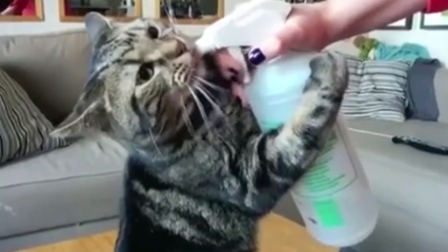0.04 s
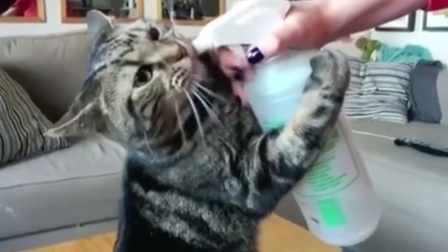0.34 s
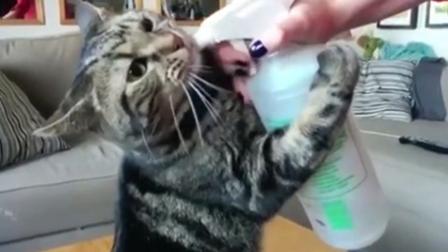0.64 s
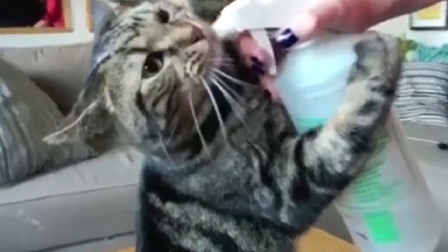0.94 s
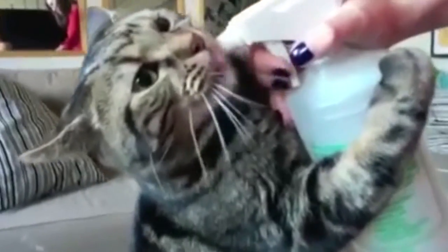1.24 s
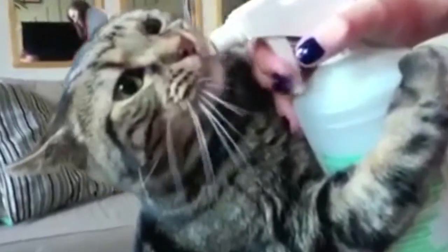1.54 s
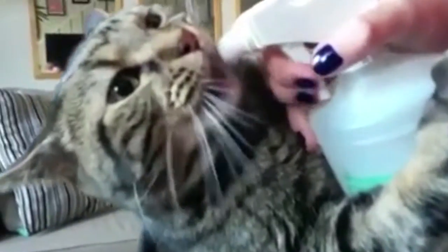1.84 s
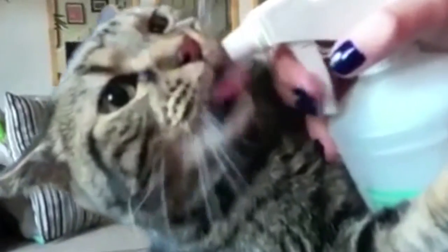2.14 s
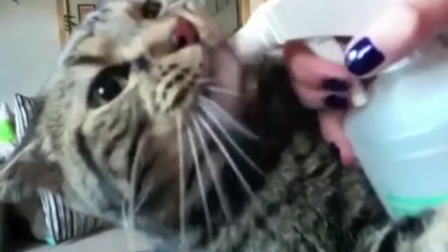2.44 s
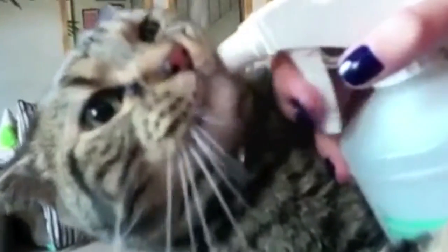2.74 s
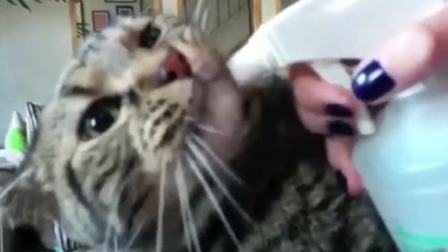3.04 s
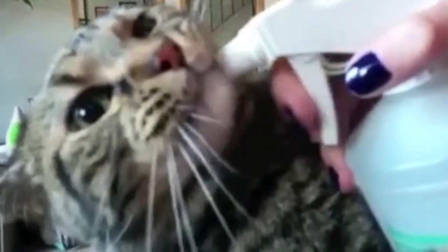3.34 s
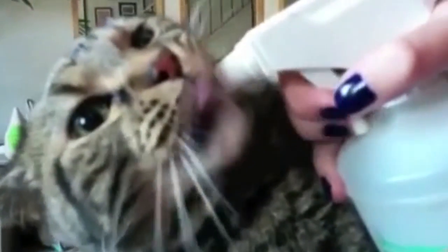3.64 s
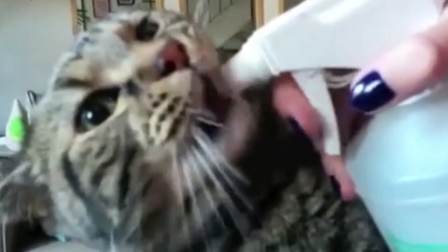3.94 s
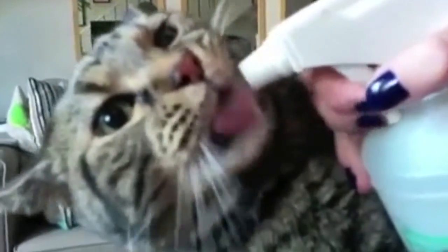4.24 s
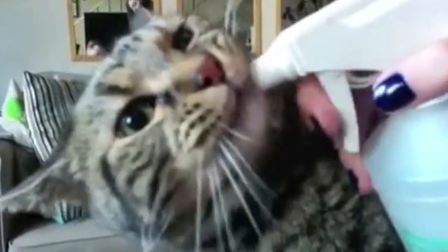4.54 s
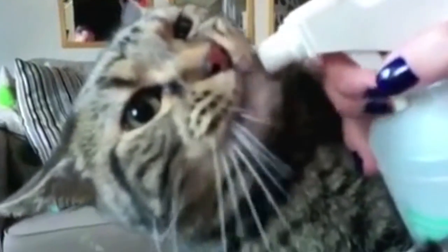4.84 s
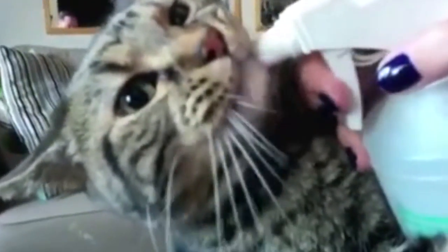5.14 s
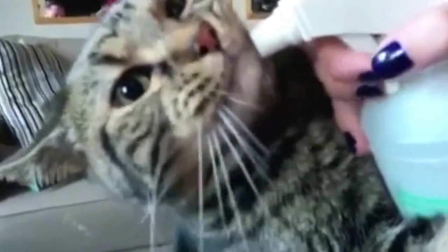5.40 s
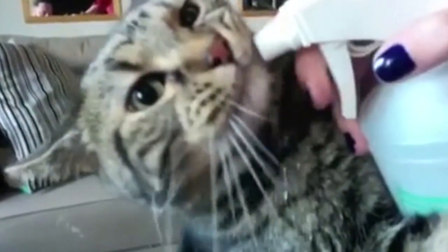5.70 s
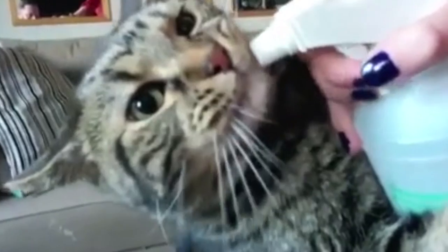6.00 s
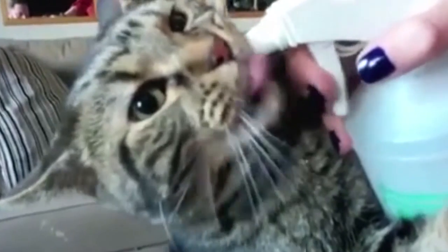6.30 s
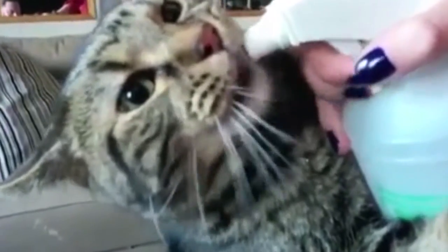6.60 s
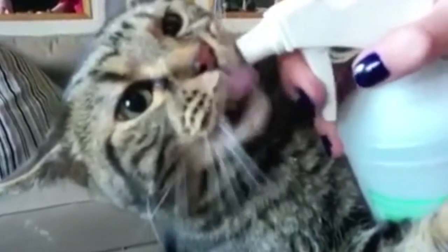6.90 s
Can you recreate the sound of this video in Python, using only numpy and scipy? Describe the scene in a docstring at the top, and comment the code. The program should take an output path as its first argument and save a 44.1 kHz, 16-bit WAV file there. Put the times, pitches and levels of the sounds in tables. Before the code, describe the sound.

Close to a phone microphone, a spray bottle's plastic trigger snaps about a dozen times, each snap followed by a brief hissing jet of water splashing on a cat's tongue. Wet lapping, gulps, plops and squelches fill the gaps, along with little valve clicks as the pump refills. The pattern continues throughout, over a very faint living room rumble that drops away in the pauses.

```python
"""A hissing water jet, squirted from a plastic trigger bottle into a cat's mouth, close to a phone.
Each further stroke snaps the trigger and frees a weak spurt, then the full jet: hiss, mist, splash.
Between strokes the pump refills and the cat laps: trains of gulps, plops, squelches.
Under it all a quiet living room rumbles and hums; the phone's noise suppressor shuts it out in pauses."""
import sys
import numpy as np
from scipy import signal
from scipy.fft import rfft, irfft, next_fast_len
from scipy.io import wavfile
from scipy.ndimage import uniform_filter1d, map_coordinates

SR = 44100
rng = np.random.default_rng(int(sys.argv[2]) if len(sys.argv) > 2 else 0)


def dump(signal):
    """Clip the signal to [-1, 1] and save it as 16-bit WAV at the path in sys.argv[1]."""
    limited = np.clip(np.atleast_2d(signal).T, -1, 1)
    pcm = np.round(limited * 32767).astype(np.int16)
    wavfile.write(sys.argv[1], SR, pcm)


N = 311346

# Event levels are ahead of the gains in scene().
# full squeezes: t/s, rise/s, hold/s, release/s, hiss/dB, mist/dB re hiss, sizzle/dB re mist,
# splash/dB re hiss
SQUIRTS = [(-.01, 0.041, 0.1, 0.1, -51, 3, 1, -6.5), (0.557, 0.054, 0.1, 0.1, -47.5, -1, -4, -6.5),
           (1.278, 0.051, .025, 0.066, -56.5, 2.5, -8, 0), (1.846, 0.055, 0.012, 0.1, -50.5, 2, -11.5, -6),
           (2.366, 0.071, 0.065, 0.073, -44, 0, -4, -7), (2.937, 0.049, 0.045, 0.12, -44.5, 0.5, -12, -5),
           (3.494, 0.053, 0.041, .16, -43.5, 0, -22, -6), (4.043, 0.054, 0.037, 0.25, -52, 0.5, -28, -1.5),
           (4.623, 0.04, 0.075, 0.18, -47, 1.5, -3.5, -3.5),
           (5.247, 0.047, 0.042, 0.091, -48, 1.5, 2.5, -3), (5.781, 0.053, .11, 0.073, -47, 4, 0.5, -7.5),
           (6.35, 0.048, 0.11, 0.034, -50, 5, -9, -2.5), (6.884, 0.071, 0.098, .1, -48, 1, -0.5, -2.5)]
# trigger pulls: t/s, snap/dB, crack/dB re snap, spurt/dB, spurt t60/s, mist/dB re spurt
PULLS = [(0.5337, -29.5, -8, -51, 0.34, -4), (1.1195, -29.5, -9, -56.5, 1.37, -0.5),
         (1.7057, -30.5, -11.5, -57.5, 5.7, 2), (2.3066, -29.5, -8, -51, 0.25, -7.5),
         (2.9047, -29.5, -5.5, -54.5, 0.95, -6.5), (3.4842, -25.5, -7, -52, .6, -0.5),
         (4.026, -32, -5, -55, 0.68, -2.5), (4.5837, -25, -7.5, -53, 0.23, 3),
         (5.1578, -29, -10, -54, 3.1, 4), (5.7307, -31.5, -11, -53, 0.27, -5),
         (6.2834, -29.5, -11.5, -56.5, 3, -5), (6.8727, -30.5, -6, -55.5, 1.1, 0)]
# jet grazing the wet lip: t/s, half width/s, hiss gain/dB, mist loss/dB
GRAZES = [(.675, 0.017, 0.5, 13), (3.53, 0.016, 1.5, 7.5), (6.462, 0.027, 10, 3)]
# jet spectra: f/Hz, level/dB
HISS_SPECTRUM = [(1500, -36.5), (2600, -24), (3300, 1), (4500, -1), (6200, 0), (7500, 0), (9500, -16),
                 (13000, -16.5)]
MIST_SPECTRUM = [(5000, -14), (7300, -14), (8400, 4), (10000, 2), (11500, 3.5), (13000, -5.5)]
SIZZLE_SPECTRUM = [(8000, -37), (10500, -36), (11700, 3), (13000, 0.5)]
SPLASH_SPECTRUM = [(100, -57), (300, -6), (550, 0), (950, -1.5), (1450, 0), (2200, -2), (2900, -1.5),
                   (4500, -6.5), (9000, -67)]
# hand and house rumble spectra: f/Hz, level/dB
HANDLING_SPECTRUM = [(20, -25), (40, 2), (60, 1), (110, -3), (160, -4), (270, -9.5), (420, -13.5),
                     (1200, -41)]
HOUSE_SPECTRUM = [(20, -22), (35, -20), (48, -1), (65, 3.5), (85, -1.5), (120, -7.5), (160, -11.5),
                  (260, -12), (350, -16), (700, -21), (2000, -22.5), (6000, -27), (13000, -33)]
# appliance hum: f/Hz, level/dB
HUM_TONES = [(59, -70), (120, -63.5), (204, -73)]
# room decay: f/Hz, t60/s
ROOM_DECAY = [(200, 0.25), (2000, 0.17), (12000, 0.074)]
# collapsing air pockets: t/s, level/dB, f/Hz
PLOPS = [(0.0113, -35, 594), (0.327, -39, 597), (0.3515, -43, 796), (0.5522, -31.5, 610),
         (0.576, -36.5, 980), (0.8766, -32.5, 570), (1.1006, -41.5, 760), (1.3292, -35.5, 670),
         (1.647, -43, 730), (1.8682, -32, 824), (1.8942, -29.5, 980), (1.915, -25.5, 1600),
         (2.1864, -37.5, 623), (2.2184, -29.5, 950), (2.4078, -34, 600), (2.5297, -26.5, 1120),
         (2.648, -33.5, 770), (2.8631, -36, 1040), (2.9677, -27, 790), (3.189, -31.5, 1000),
         (3.21, -28.5, 1210), (3.5557, -26, 1500), (3.6417, -27, 1870), (3.7413, -33.5, 634),
         (3.9864, -31.5, 607), (4.296, -33, 744), (4.5176, -34, 605), (4.5652, -30, 1520),
         (4.7115, -22, 1390), (4.8222, -35, 850), (5.0401, -37, 600), (5.2794, -28.5, 620),
         (5.3189, -28.5, 1450), (5.6298, -44, 910), (5.829, -31, 603), (6.15, -34.5, 730),
         (6.1784, -30.5, 1110), (6.3855, -26.5, 660), (6.4594, -26.5, 1530), (6.6201, -29, 640),
         (6.9424, -32, 750)]
# pump and tongue strokes: t/s, gulps, first gulp/dB, step per gulp/dB, gurgle/dB re gulp, spit/dB re gulp
SLOSHES = [(0.212, 2, -65, -3.5, 8, 9), (0.268, 2, -56.5, -1.5, -1, -3.5), (0.328, 2, -63, 2, 5.5, -13),
           (0.427, 2, -60, -4, 4.5, 2.5), (0.82, 4, -57, -1, 1.5, -6.5), (0.982, 2, -58, -3, 6, 2),
           (1.426, 2, -52.5, -7.5, -1, -4), (1.536, 2, -51.5, -15, 0.5, 8.5), (1.59, 2, -62, -5.5, 10, 2),
           (1.68, 1, -55.5, 11, -4, -7), (2.035, 3, -55.5, -4, -1.5, -1.5), (2.142, 1, -62.5, -3, 11, -5),
           (2.19, 3, -55.5, 1, 0, -3), (2.626, 2, -53, 6.5, 1, -6), (2.791, 4, -58, -1, 7.5, -1),
           (3.186, 2, -51, 4.5, 2, -8.5), (3.364, 2, -57, 2.5, 8.5, 1), (3.742, 1, -52.5, 8, 0, 8.5),
           (3.767, 2, -44.5, -7.5, 0, -7), (3.932, 3, -58.5, -6, 8.5, 1.5), (4.229, 1, -56.5, 0, -4, 6),
           (4.301, 3, -55.5, 2.5, 0, -4), (4.408, 1, -62, -2, -7, -2), (4.497, 3, -56, -4, 7.5, 3.5),
           (4.86, 3, -56.5, 2, -6.5, -5), (4.966, 1, -60.5, 0, -9, -16), (5.043, 1, -57, 0, 8, -5),
           (5.081, 2, -48, -14, -12, 2), (5.464, 2, -52, -2.5, 0, -2.5), (5.589, 1, -69, 3, 16, -3),
           (5.623, 3, -50, -11, 7, -1.5), (6.018, 2, -51, -9.5, 0, -1), (6.164, 3, -50, -5.5, 2.5, -0.5),
           (6.238, 1, -59, 0, -15, -10), (6.558, 1, -51.5, 0, -12, -6.5), (6.591, 3, -49.5, -6.5, 0.5, -5),
           (6.752, 2, -57.5, -11, 7.5, 2), (6.826, 1, -66, 8, 16.5, 2)]
# gulp spectra, hollow to fine: f/Hz, level/dB
GURGLE_SPECTRUM = [(90, -49), (250, -1.5), (370, -8.5), (550, 1), (750, -11.5), (950, 3.5), (1200, -9),
                   (1500, -2.5), (2200, -14.5), (5000, -51)]
SUCK_SPECTRUM = [(700, -14), (1500, 0), (2000, -1), (2600, 2.5), (3200, 3), (4200, -1), (5500, -8.5),
                 (9000, -52)]
SPIT_SPECTRUM = [(2500, -48), (4500, -8.5), (5700, -0.5), (8500, -4), (13000, -6)]
# valve clicks between pulls: t/s, level/dB, f/Hz, crack/dB re click
VALVE_CLICKS = [(0.2679, -53, 3230, -11), (1.3664, -36, 2620, -14), (1.6735, -39.5, 3330, -22),
                (2.6275, -39.5, 3010, -22), (3.201, -39, 3170, -14), (3.221, -39, 3180, -7),
                (3.7719, -37.5, 3150, -16), (4.3232, -40.5, 2810, -6), (4.3456, -41.5, 2800, -15),
                (4.911, -38, 2860, -11), (5.0898, -35, 2980, -2.5), (6.1915, -29.5, 2660, -17),
                (6.5955, -38.5, 3150, -0.5)]
# spray head modes: ratio to click pitch, level/dB, t60/s
HEAD_MODES = [(.8, -9.5, 0.037), (.92, -10, 0.013), (1.01, 1.5, 0.02), (1.16, -18.5, 0.018)]
# bottle and pump barrel modes: f/Hz, level/dB, t60/s
BOTTLE_MODES = [(253, -19, 0.14), (550, -1, 0.028), (1010, -1.5, 0.043), (1455, 8, 0.013)]
BARREL_MODES = [(249, -7, 0.11), (546, -17, 0.027), (920, 5.5, 0.024), (1570, -13, 0.01)]
# plastic crack spectrum: f/Hz, level/dB
CRACK_SPECTRUM = [(1000, -36), (4300, -6), (5800, 19.5), (7200, -5), (13000, -22)]
# piston returns: t/s, level/dB
PISTON_KNOCKS = [(0.4293, -49), (0.9907, -49.5), (1.592, -46.5), (2.795, -42.5), (3.367, -47),
                 (3.9359, -42.5), (4.4998, -43.5), (5.6266, -40), (6.1168, -49.5), (6.7562, -44)]
# water forced through a gap: t/s, level/dB, f/Hz, length/s
SQUELCHES = [(1.364, -46.5, 2400, 0.018), (1.904, -45, 1430, 0.026), (2.218, -47.5, 1440, 0.015),
             (2.52, -44.5, 1390, 0.028), (3, -46.5, 1490, .029), (3.626, -47, 2040, 0.088),
             (4.775, -45.5, 2450, 0.019), (5.472, -49, 2530, 0.03), (5.786, -49.5, 2030, 0.02),
             (6.555, -48.5, 2240, .012), (6.957, -46, 1190, 0.036)]
# big drops bursting: t/s, level/dB
DROPS = [(2.5323, -32.5), (3.0359, -43), (4.5646, -31.5), (4.69, -32), (4.7218, -31), (6.458, -31),
         (6.4816, -34)]

SAG_DB_PER_S, RELEASE_DB, RELEASE_EXPONENT = 17, 24, 1.31
SIZZLE_FADE_DB_PER_S, SPLASH_EXPONENT = 35, 0.56
SPURT_RISE_S, HANDOVER_S = 0.0061, 0.046
SPURT_SIZZLE_DB, SPURT_SPLASH_DB, SPURT_DRY_DB_PER_S = -5, 5, 33
GULP_GAP_S, GULP_T60_S, GULP_JITTER_S = 0.022, 0.11, 0.0013
SNAP_HZ, BAND_LIMIT_HZ = 3150, 13330


def amp(db):
    """dB to gain."""
    return 10 ** (np.asarray(db) / 20)


def unit_rms(x):
    """Scale to rms 1."""
    return x / np.sqrt(np.mean(x ** 2) + 1e-20)


def burst(x):
    """Scale to the energy of 1 ms at level 1."""
    return x * np.sqrt(SR / 1000 / np.sum(x ** 2))


def log_interp(points, hz):
    """Read (f/Hz, value) points on a log axis."""
    knots_hz, values = np.transpose(points)
    return np.interp(np.log(hz + 1), np.log(knots_hz + 1), values)


def filtered(x, response):
    """Zero-phase filter with gain response(hz)."""
    size = next_fast_len(len(x) + 8192)
    return irfft(rfft(x, size) * response(np.fft.rfftfreq(size, 1 / SR)), size)[:len(x)]


def coloured(x, spectrum):
    """Apply a spectrum; rms 1."""
    return unit_rms(filtered(x, lambda hz: amp(log_interp(spectrum, hz))))


def wobble(rate_hz):
    """Smooth random curve, knots at rate_hz."""
    knots = rng.standard_normal(int(N * rate_hz / SR) + 4)
    return map_coordinates(knots, [np.arange(N) * rate_hz / SR])


def add(track, at_s, sound):
    """Mix in at at_s."""
    start = round(at_s * SR)
    part = sound[max(-start, 0):N - start]
    track[max(start, 0):][:len(part)] += part


def spatter(spectrum, rate_hz, share, patchy_db):
    """Droplet impacts (share of the power) on turbulence, through a cavity of changing shape."""
    impacts = unit_rms((rng.random(N) < rate_hz / SR) * rng.standard_normal(N))
    source = np.sqrt(share) * impacts + np.sqrt(1 - share) * rng.standard_normal(N)
    bins = signal.stft(source, nperseg=256)[2]
    cavity = uniform_filter1d(rng.standard_normal(bins.shape), size=4, axis=0)
    cavity = unit_rms(uniform_filter1d(cavity, size=9, axis=1))
    return coloured(signal.istft(bins * amp(patchy_db * cavity), nperseg=256)[1][:N], spectrum)


def squeeze(t, rise_s, hold_s, release_s):
    """Jet pressure: builds, sags while held, runs out."""
    build = np.sin(np.pi / 2 * np.clip(t / rise_s, 0, 1)) ** 2
    spent = np.clip((t - rise_s - hold_s) / release_s, 0, None)
    return build * amp(-SAG_DB_PER_S * (t - rise_s) - RELEASE_DB * spent ** RELEASE_EXPONENT)


def jet_envelopes():
    """Hiss, mist, sizzle, splash: a slow, splashy spurt hands over to the full jet."""
    envelopes, t = np.zeros((4, N)), np.arange(SR // 2) / SR
    for at_s, _, _, db, t60_s, mist_db in PULLS:
        peaks_s = (start_s + rise_s for start_s, rise_s, *_ in SQUIRTS if start_s > at_s)
        full_jet_s = min(peaks_s, default=at_s + t[-1])
        handover = np.clip((full_jet_s - at_s - t) / HANDOVER_S, 0, 1)
        spurt = (1 - np.exp(-t / SPURT_RISE_S)) * amp(db - 60 * t / t60_s) * handover
        parts_db = 0, mist_db, mist_db + SPURT_SIZZLE_DB, SPURT_SPLASH_DB - SPURT_DRY_DB_PER_S * t
        for envelope, part_db in zip(envelopes, parts_db):
            add(envelope, at_s, amp(part_db) * spurt)
    for at_s, rise_s, hold_s, release_s, db, mist_db, sizzle_db, splash_db in SQUIRTS:
        pressure = squeeze(t, rise_s, hold_s, release_s)
        past_mid_s = np.clip(t - rise_s - hold_s / 2, -hold_s / 2, hold_s)
        sizzle = amp(mist_db + sizzle_db - SIZZLE_FADE_DB_PER_S * past_mid_s) * pressure
        splash = amp(splash_db) * pressure ** SPLASH_EXPONENT
        for envelope, part in zip(envelopes, (pressure, amp(mist_db) * pressure, sizzle, splash)):
            add(envelope, at_s, amp(db) * part)
    for at_s, width_s, gain_db, loss_db in GRAZES:
        touch = np.exp(-((np.arange(N) / SR - at_s) / width_s) ** 2)
        envelopes *= amp(np.outer([gain_db, -loss_db, -loss_db, 0], touch))
    return envelopes


def jet(hiss_db, mist_db, sizzle_db, splash_db, flutter_db, wander_db):
    """Nozzle hisses, mist sizzles, stream splashes on the tongue."""
    hiss = amp(hiss_db) * spatter(HISS_SPECTRUM, rate_hz=810, share=0.27, patchy_db=2.5)
    mist_gain = amp(mist_db + wander_db * wobble(25))
    mist = mist_gain * spatter(MIST_SPECTRUM, rate_hz=2400, share=0.18, patchy_db=4.0)
    sizzle = amp(sizzle_db) * coloured(rng.standard_normal(N), SIZZLE_SPECTRUM)
    splash_gain = amp(splash_db + 0.96 * wobble(90))
    splash = splash_gain * spatter(SPLASH_SPECTRUM, rate_hz=600, share=0.31, patchy_db=3.0)
    flutter = amp(flutter_db * wobble(110))
    return flutter * np.sum(jet_envelopes() * [hiss, mist, sizzle, splash], axis=0)


def handling(near, level_db, exponent):
    """Hand and moving water rumble, following the power of the near sounds."""
    power = np.abs(uniform_filter1d(near ** 2, size=900)) + 1e-14
    rumble = coloured(rng.standard_normal(N), HANDLING_SPECTRUM)
    return amp(level_db) * unit_rms(power ** exponent * rumble)


def house(noise_db, hum_db, waver_rad):
    """Low house rumble, wavering mains hum."""
    t = np.arange(N) / SR
    hum = sum(amp(db) * np.sqrt(2) * np.sin(2 * np.pi * hz * t + waver_rad * wobble(5))
              for hz, db in HUM_TONES)
    return amp(noise_db) * coloured(rng.standard_normal(N), HOUSE_SPECTRUM) + amp(hum_db) * hum


def room(x):
    """Short reverb of a furnished room, 4 ms late."""
    hz, t, bins = signal.stft(rng.standard_normal(SR // 2), SR, nperseg=256)
    decay = amp(-60 * t / log_interp(ROOM_DECAY, hz)[:, None])
    tail = signal.istft(bins * decay, SR, nperseg=256)[1]
    tail = np.pad(tail, (SR // 250, 0))
    return signal.fftconvolve(x, tail / np.linalg.norm(tail))[:N]


def plops(gain_db, swell_cycles, ring_db, ring_cycles):
    """An air pocket swings hard for a cycle or two, then rings faintly."""
    track, t = np.zeros(N), np.arange(SR // 20) / SR
    for at_s, db, hz in PLOPS:
        cycles = hz * t
        swell = cycles / swell_cycles
        swing = swell * np.exp(1 - swell)
        tail = amp(ring_db) * (1 - np.exp(-swell)) * np.exp(-cycles / ring_cycles)
        add(track, at_s, amp(db + gain_db) * (swing + tail) * np.sin(2 * np.pi * cycles))
    return track


def sloshes(gurgle_db, suck_db, spit_db, rise_s, lumpy_db, decay_exponent):
    """Pump and mouth draw water and air in gulps, each a clump of bubbles thinning out."""
    envelopes, t = np.zeros((3, N)), np.arange(SR // 4) / SR
    gulp = (1 - np.exp(-t / rise_s)) * amp(-60 * (t / GULP_T60_S) ** decay_exponent)
    for at_s, gulps, db, step_db, hollow_db, fine_db in SLOSHES:
        for k in range(gulps):
            jitter_s = min(k, 1) * GULP_JITTER_S * rng.standard_normal()
            onset_s = at_s + k * GULP_GAP_S + jitter_s - rise_s / 2
            for envelope, part_db in zip(envelopes, (hollow_db, 0, fine_db)):
                add(envelope, onset_s, amp(db + k * step_db + part_db) * gulp)
    gurgle = amp(gurgle_db) * spatter(GURGLE_SPECTRUM, rate_hz=300, share=0.79, patchy_db=4.0)
    suck = amp(suck_db) * spatter(SUCK_SPECTRUM, rate_hz=230, share=0.61, patchy_db=3.5)
    spit = amp(spit_db) * spatter(SPIT_SPECTRUM, rate_hz=970, share=0.68, patchy_db=5.5)
    return amp(lumpy_db * wobble(160)) * np.sum(envelopes * [gurgle, suck, spit], axis=0)


def ring(modes, t, detune, scatter_db):
    """Damped modes struck once, peak 1; the grip shifts pitch and strength."""
    sound = np.zeros(len(t))
    for hz, db, t60_s in modes:
        strength, shift, phase = rng.standard_normal(3)
        decay = amp(db + scatter_db * strength - 60 * t / t60_s)
        sound += decay * np.sin(2 * np.pi * hz * (1 + detune * shift) * t + phase)
    return sound / np.abs(sound).max()


def clicks_and_snaps(gain_db, bottle_db, crack_db, attack_s, rebound_db, rebound_s, contacts):
    """Valve and trigger chatter: quick contacts ring the spray head, over a bottle knock and a crack."""
    track, t = np.zeros(N), np.arange(SR // 10) / SR
    snaps = [(at_s, db, SNAP_HZ, edge_db) for at_s, db, edge_db, *_ in PULLS]
    for at_s, db, hz, edge_db in snaps + list(VALVE_CLICKS):
        modes = [(ratio * hz, mode_db, t60_s) for ratio, mode_db, t60_s in HEAD_MODES]
        head = np.zeros(len(t))
        for k in range(contacts):
            delay = round(k * rebound_s * rng.uniform(0.884, 1.146) * SR)
            contact = ring(modes, t, detune=0.035, scatter_db=1.0)
            head += amp(k * rebound_db) * np.pad(contact, (delay, 0))[:len(t)]
        bottle = ring(BOTTLE_MODES, t, detune=0.066, scatter_db=2.0)
        crack = amp(-60 * t / 0.013) * coloured(rng.standard_normal(len(t)), CRACK_SPECTRUM)
        snap = burst(head) + amp(bottle_db) * burst(bottle) + amp(crack_db + edge_db) * burst(crack)
        add(track, at_s, amp(db + gain_db) * (1 - np.exp(-t / attack_s)) * snap)
    return track


def piston(gain_db, attack_s):
    """The returning piston knocks in its hollow barrel."""
    track, t = np.zeros(N), np.arange(SR // 10) / SR
    for at_s, db in PISTON_KNOCKS:
        knock = ring(BARREL_MODES, t, detune=0.026, scatter_db=-0.5)
        add(track, at_s, amp(db + gain_db) * (1 - np.exp(-t / attack_s)) * knock)
    return track


def squelches(gain_db, half_width_hz):
    """A narrow wet gap turns flow into a rough, loosely pitched chirr."""
    track = np.zeros(N)
    for at_s, db, pitch_hz, length_s in SQUELCHES:
        flow = rng.standard_normal(SR // 4)
        chirr = unit_rms(filtered(flow, lambda hz: 1 / (1 + ((hz - pitch_hz) / half_width_hz) ** 2)))
        window = signal.windows.tukey(int(length_s * SR), 0.5)
        add(track, at_s, amp(db + gain_db) * window * chirr[:len(window)])
    return track


def drops(gain_db, t60_s):
    """Big drops burst with a bright tick."""
    track, t = np.zeros(N), np.arange(SR // 40) / SR
    for at_s, db in DROPS:
        tick = amp(-60 * t / t60_s) * coloured(rng.standard_normal(len(t)), SPIT_SPECTRUM)
        add(track, at_s, amp(db + gain_db) * tick / np.abs(tick).max())
    return track


def scene():
    """Bottle and cat near, room behind; mono."""
    near = jet(hiss_db=0.43, mist_db=2.5, sizzle_db=4.0, splash_db=-1.22, flutter_db=1.18, wander_db=1.46)
    near += clicks_and_snaps(gain_db=-2.5, bottle_db=-3.5, crack_db=-1.5, attack_s=0.00029,
                             rebound_db=-5.5, rebound_s=0.0018, contacts=3)
    near += piston(gain_db=6.5, attack_s=0.0013)
    near += sloshes(gurgle_db=-1.5, suck_db=1.0, spit_db=1.0, rise_s=0.0026, lumpy_db=2.0,
                    decay_exponent=1.067)
    near += plops(gain_db=-3.5, swell_cycles=0.45, ring_db=-21.5, ring_cycles=5.3)
    near += squelches(gain_db=-2.5, half_width_hz=330)
    near += drops(gain_db=5.5, t60_s=0.02)
    rumble = handling(near, level_db=-64.5, exponent=0.35)
    reverb = amp(-14) * room(near)
    return (near + reverb + rumble + house(noise_db=-58, hum_db=-3.5, waver_rad=0.42))[None]


def suppress(x, threshold_db, steepness):
    """Noise suppressor: gain sinks when power above 400 Hz is low."""
    above_bass = filtered(x, lambda hz: hz > 400)
    power = np.abs(uniform_filter1d(above_bass ** 2, size=440)) + 1e-14
    return x / (1 + (amp(threshold_db) ** 2 / power) ** steepness)


def record(dry):
    """Phone: noise suppressor, then a steep low-pass."""
    gated = suppress(dry[0], threshold_db=-57.5, steepness=1.64)
    return filtered(gated, lambda hz: 1 / np.sqrt(1 + (hz / BAND_LIMIT_HZ) ** 260))[None]


dry = scene()
out = record(dry)
dump(out)
```